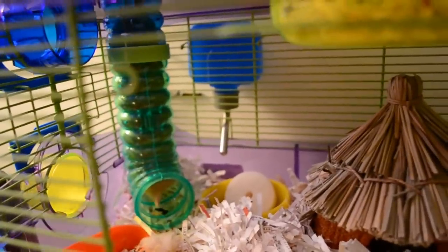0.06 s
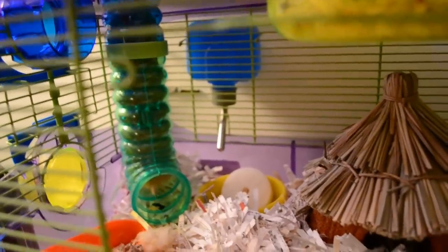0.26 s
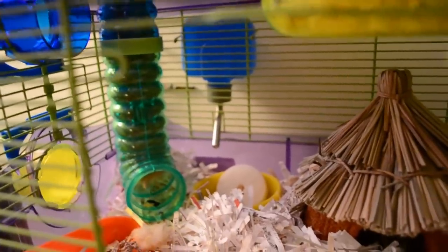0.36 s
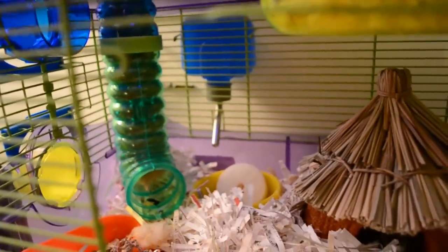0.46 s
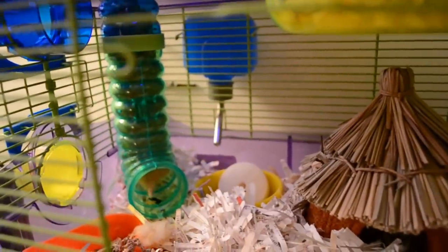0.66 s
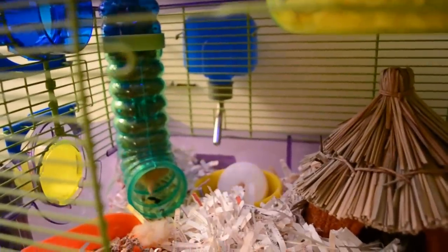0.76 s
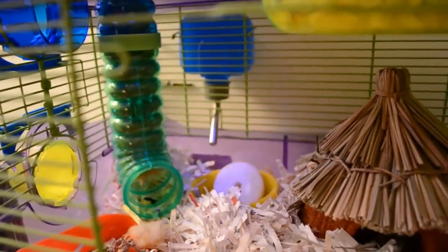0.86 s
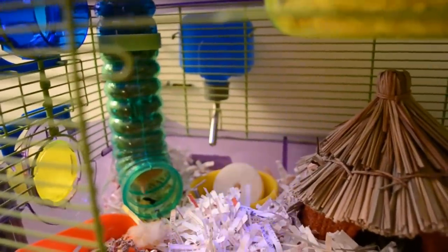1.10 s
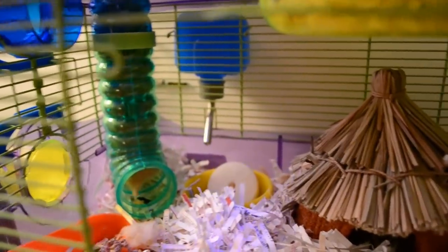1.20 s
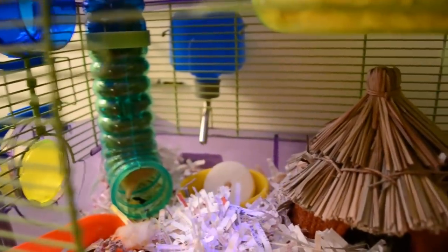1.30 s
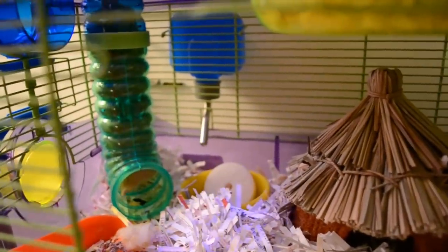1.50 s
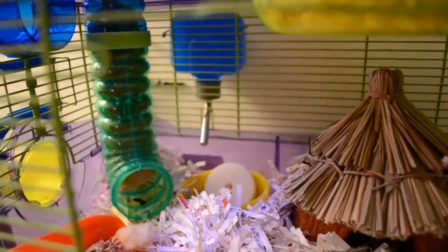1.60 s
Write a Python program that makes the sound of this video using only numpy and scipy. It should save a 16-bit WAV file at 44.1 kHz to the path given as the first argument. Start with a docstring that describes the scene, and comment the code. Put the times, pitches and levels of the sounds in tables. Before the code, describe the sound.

Hard food clicks and knocks irregularly against a plastic cage as a hamster handles it. The clicks thin out and stop, with faint scrapes and paper bedding rustling over a quiet hum in a small room.

```python
"""Hard bits of food click and knock against a plastic cage as a hamster handles them.
Each knock gives a short, dense clack, rings the plastic and makes the base thump a moment later.
A small room echoes the clacks. Claws and food scrape the plastic now and then.
Behind it all are a faint rustle of bedding and a quiet, fan-like hum."""
import sys
import numpy as np
from scipy import signal
from scipy.fft import rfft, irfft
from scipy.io import wavfile
from scipy.ndimage import uniform_filter1d

SR = 44100
rng = np.random.default_rng(int(sys.argv[2]) if len(sys.argv) > 2 else 0)


def master_out(mix):
    """Clip the mix to full scale and print it as 16-bit PCM to the path in sys.argv[1]."""
    frames = np.transpose(np.atleast_2d(mix))
    ceiling = np.clip(frames, -1, 1)
    pcm = np.round(ceiling * 32767).astype(np.int16)
    wavfile.write(sys.argv[1], SR, pcm)


N = 72765

# One row per knock. A fade time is how long a sound takes to drop by 60 dB.
# (time [s], clack level [dB], clack brightness [dB per octave], rise time [s], clack fade time [s],
#  ring level [dB], thump level [dB], wall pitch [Hz], wall level [dB], snap pitch [Hz], snap level [dB])
KNOCKS = [ (0.1484, -25.5, -1.5, 0.00033, 0.043, -33.5, -44.5, 853, -27.5, 2367, -32),
          (.2230, -29.5, -3.5, 0.0007, 0.081, -40, -46.5, 855, -25.5, 2310, -30.5),
          (.2515, -42, -14, 0.0016, 0.054, -45, -49, 897, -35, 2330, -37),
          (0.3441, -30.5, -8.5, 0.0012, 0.018, -64, -47, 863, -30, 2220, -33),
          (0.4076, -45.5, -4, 0.00065, 0.045, -71, -50, 818, -38, 2300, -68),
          (0.539, -27, 3, 0.00035, 0.052, -27.5, -38, 980, -22, 4150, -29.5),
          (0.6559, -34.5, -0.5, 0.00046, 0.05, -57, -41, 990, -44, 4190, -34.5),
          (.6772, -31.5, 0, 0.00034, 0.027, -43.5, -46, 888, -35.5, 2350, -49),
          (0.7024, -32, .5, 0.00071, 0.08, -35.5, -38, 785, -31, 4190, -48),
          (.8625, -38, -1, 0.0008, 0.021, -44, -40, 765, -32.5, 1620, -58),
          (0.9777, -31, 3.5, 0.00051, 0.034, -45, -40, 731, -30, 4093, -26),
          (1.0510, -34, -1.5, 0.00049, 0.041, -44.5, -50.5, 805, -34.5, 4200, -36.5),
          (1.1560, -45, -3.5, 0.00084, .03, -68, -48.5, 927, -46, 3940, -50)]
# Tone colour of a clack (frequency [Hz], level [dB])
CLACK_COLOUR = [(150, -31.5), (300, -19.5), (560, -2.5), (670, -7), (780, -1.5), (930, -3.5), (1150, -6.5),
                (1500, -3), (1800, -8), (2300, -1.5), (2900, -12), (3500, -10.5), (4150, -7.5),
                (4800, -17.5), (6500, -14.5), (7700, -25.5), (8800, -20), (10500, -30), (15000, -48.5)]
# Tones at which the plastic rings (pitch [Hz], level [dB], fade time [s])
PLASTIC_TONES = [(568.6, -8, 0.11), (706.6, -8, 0.22), (939, -5, 0.1), (1050, -7.5, 0.1),
                 (1454, 1.5, 0.084), (1531, 1.5, 0.039), (2278, -13.5, .14), (2364, -15.5, 0.14),
                 (2630, -19, 0.11), (3737, -28, 0.48), (4040, -9.5, 0.032), (6200, -33, 0.26),
                 (8130, -40, 0.028)]
# Low tones of the cage base (pitch [Hz], level [dB], fade time [s])
BASE_TONES = [(334.7, 1, 0.087), (371.8, 3, .14), (415.8, -2.5, 0.16)]
# How long the room echoes (frequency [Hz], fade time [s])
ECHO_FADES = [(300, 0.61), (800, 0.4), (2100, 0.2), (5500, 0.19), (12000, 0.14)]
# Scrapes on the plastic (time [s], length [s], level [dB], centre frequency [Hz])
SCRAPES = [(0.294, .035, -67, 4500), (0.336, .03, -65.5, 7000), (0.584, 0.08, -50, 960),
           (0.844, 0.05, -66.5, 5060)]
# Loudness of the bedding (time [s], level [dB])
RUSTLE_LEVELS = [(0, -65), (0.119, -61), (.31, -56.5), (.45, -63), (.63, -62.5), (.78, -65.5), (.85, -54.5),
                 (.93, -65.5), (1.1, -68.5), (1.3, -67), (1.65, -71.5)]
# Tone colour of the bedding (frequency [Hz], level [dB])
RUSTLE_COLOUR = [(200, -10.5), (800, 3), (2200, -11), (4000, -11.5), (7000, -18.5), (10000, -24),
                 (15000, -52)]
# Tone colour of the air noise in the room (frequency [Hz], level [dB])
AIR_COLOUR = [(20, -16.5), (45, -21), (95, -9), (140, -12), (180, -2.5), (245, -7.5), (330, -5.5), (430, 1),
              (560, -2.5), (720, -2), (1050, -8.5), (1600, -7), (2500, -13), (3800, -18.5), (5000, -26.5),
              (6500, -30.5), (8000, -41), (9700, -41), (11200, -56), (15000, -64)]
# Tones of the hum (pitch [Hz], level [dB])
HUM_TONES = [(173, -72), (274.5, -71), (479.1, -60)]
# Tone colour of the microphone, with a dip near 12 kHz (frequency [Hz], level [dB])
MIC_COLOUR = [(10500, 0), (11300, -8.5), (11900, -31), (12500, -27), (13300, 1), (15000, -2)]


def knocks():
    """Each hit clacks, sounds the wall and the hard bit, rings the plastic and thumps the base."""
    out, t = np.zeros(N), np.arange(2 ** 14) / SR
    no_bass = signal.butter(3, 250, "high", fs=SR, output="sos")  # small parts give off no bass
    for (start, clack_db, brightness, rise_s, fade_s, ring_db, thump_db,
         wall_hz, wall_db, snap_hz, snap_db) in KNOCKS:
        rise = 1 - np.exp(-t / rise_s)
        plastic = gain(ring_db) * ring(t, PLASTIC_TONES)
        wall = gain(wall_db) * tone_pair(t, wall_hz, fade_s=0.072, gap=0.082)
        snap = gain(snap_db) * tone_pair(t, snap_hz, fade_s=0.025, gap=0.029)
        tones = signal.sosfilt(no_bass, (plastic + wall + snap) * rise)
        thump = gain(thump_db) * rise * base_thump(t)
        add(out, start, gain(clack_db) * clack(t, brightness, rise, fade_s) + tones + thump)
    return out


def clack(t, brightness, rise, fade_s):
    """Many short tones blur into noise, and the room echoes it. Each knock has its own brightness."""
    middle_hz, bass_share = 1100, 0.49  # brightness acts less strongly below the middle
    edges = np.geomspace(180, 16000, 25)  # band edges in Hz
    freqs = np.fft.rfftfreq(len(t), 1 / SR)
    echo_rise = gain(-13) * (1 - np.exp(-t / 0.005))
    out = 0
    for low, high in zip(edges[:-1], edges[1:]):
        hz = np.sqrt(low * high)
        octaves = np.log2(hz / middle_hz)
        tilt_db = brightness * octaves * (1 if octaves > 0 else bass_share)
        level = gain(tilt_db) * np.sqrt((high - low) / middle_hz)
        direct = fade(t, fade_s * 2 ** (-0.22 * max(octaves, 0)))  # high bands die sooner
        echo = echo_rise * fade(t, at_hz(ECHO_FADES, hz))
        in_band = (freqs >= low) & (freqs < high)
        for shape in (direct, echo):
            noise = irfft(rfft(rng.standard_normal(len(t))) * in_band)
            out += level * unit(noise * shape) * np.sqrt(np.mean(shape ** 2))
    return colour(out * rise, CLACK_COLOUR)


def ring(t, tones):
    """A struck part rings with fading tones, each starting at a random point in its wave."""
    return sum(gain(db) * fade(t, fade_s) * np.sin(2 * np.pi * (hz * t + rng.random()))
               for hz, db, fade_s in tones)


def tone_pair(t, hz, fade_s, gap):
    """Two close tones, hz * gap apart, are struck together and pulse as they fade."""
    pulsing = np.cos(np.pi * hz * gap * t)
    return pulsing * ring(t, [(hz, 0, fade_s)])


def base_thump(t):
    """The cage base rings a little at once and swells a moment later."""
    at_once, delay_s, swell_s = 0.32, 0.012, 0.00094
    swell = (1 + np.tanh((t - delay_s) / swell_s)) / 2
    return (at_once + (1 - at_once) * swell) * ring(t, BASE_TONES)


def scrapes():
    """Claws and food stick and slip on the plastic, making dense ticks that swell and fade."""
    out, t = np.zeros(N), np.arange(2 ** 13) / SR
    for start, length, db, hz in SCRAPES:
        ticks = rng.standard_normal(len(t)) ** 3  # cubing makes the noise spiky
        broad_peak = [(hz / 4, -46), (hz, 0), (hz * 4, -46)]
        swell = np.sin(np.pi * np.minimum(t / length, 1))
        add(out, start, gain(db) * swell * unit(colour(ticks, broad_peak)))
    return out


def bedding():
    """Paper bedding gives tiny, dense crackles that die away as the animal settles."""
    crackles_per_s, spread_db = 780, 3
    clicks = (rng.random(N) < crackles_per_s / SR) * rng.choice([-1, 1], N)
    sizes = gain(spread_db * np.minimum(rng.exponential(size=N), 4))
    t = np.arange(2 ** 11) / SR
    burst = rng.standard_normal(len(t)) * fade(t, fade_s=0.051)
    crackles = signal.fftconvolve(clicks * sizes, burst)[:N]  # each click becomes a short burst
    level_db = np.interp(np.arange(N) / SR, *np.array(RUSTLE_LEVELS).T)
    return gain(level_db) * unit(colour(crackles, RUSTLE_COLOUR))


def room_noise():
    """Soft, steady air noise with a few slightly wavering hum tones."""
    air_db, waver_hz = -53, 1.41
    out = gain(air_db) * unit(colour(rng.standard_normal(N), AIR_COLOUR))
    for hz, db in HUM_TONES:
        drift = unit(uniform_filter1d(rng.standard_normal(N), size=4000))
        cycles = np.cumsum(hz + waver_hz * drift) / SR
        out += gain(db) * unit(np.sin(2 * np.pi * cycles))
    return out


def gain(db):
    """Turn decibels into a number to multiply by."""
    return 10 ** (np.asarray(db) / 20)


def unit(x):
    """Scale a sound to an average (rms) level of 1."""
    return x / np.sqrt(np.mean(x ** 2))


def fade(t, fade_s):
    """A curve that drops by 60 dB every fade_s seconds."""
    return np.exp(-np.log(1000) * t / fade_s)


def at_hz(points, hz):
    """Read between the rows of a (frequency, value) table, with octaves evenly spaced."""
    freqs, values = np.array(points, float).T
    return np.interp(np.log(np.maximum(hz, 1)), np.log(freqs), values)


def colour(x, points):
    """Filter a sound with a (frequency [Hz], level [dB]) curve."""
    size = 4096
    curve_db = at_hz(points, np.arange(size // 2 + 1) * SR / size)
    folded = irfft(curve_db * np.log(10) / 20)
    # Fold the second half onto the first, so the filter never sounds ahead of its input.
    folded[1:size // 2] *= 2
    folded[size // 2 + 1:] = 0
    click_response = irfft(np.exp(rfft(folded)))
    return signal.fftconvolve(x, click_response)[:len(x)]


def add(out, start, x):
    """Mix x into out at a start time in seconds."""
    i = int(start * SR)
    out[i:i + len(x)] += x[:N - i]


def scene():
    """Knocks, scrapes and rustle in the quiet room, on one channel."""
    return (knocks() + scrapes() + bedding() + room_noise())[None]


def record(dry):
    """The microphone colours the sound, and the highest treble is cut off."""
    top_hz = 15750
    treble_cut = signal.ellip(8, 0.2, 70, top_hz, fs=SR, output="sos")
    return signal.sosfilt(treble_cut, colour(dry[0], MIC_COLOUR))[None]


dry = scene()
out = record(dry)
master_out(out)
```